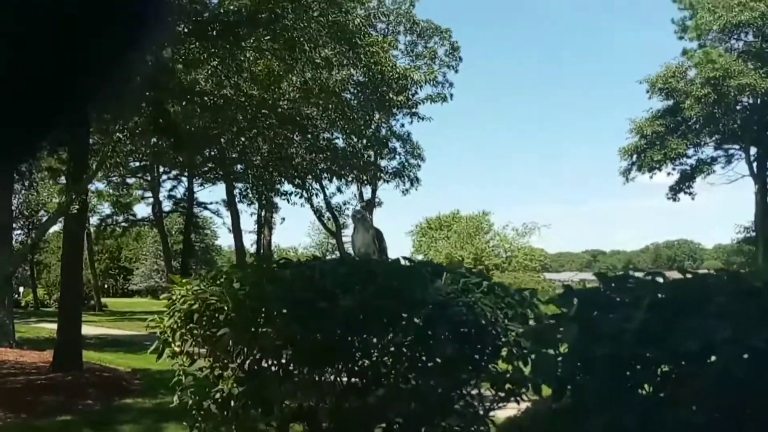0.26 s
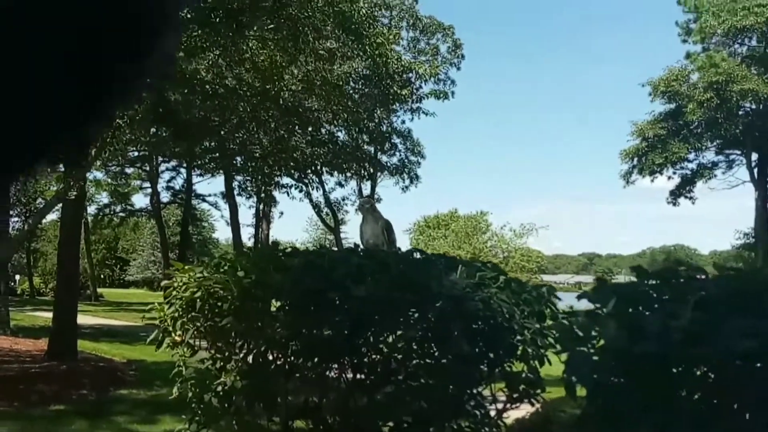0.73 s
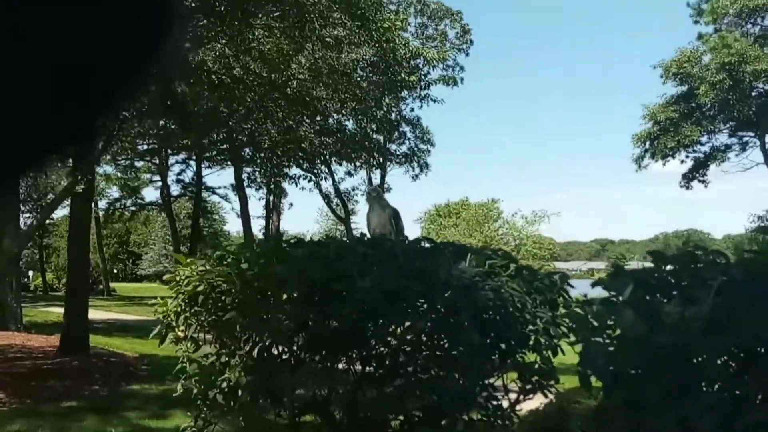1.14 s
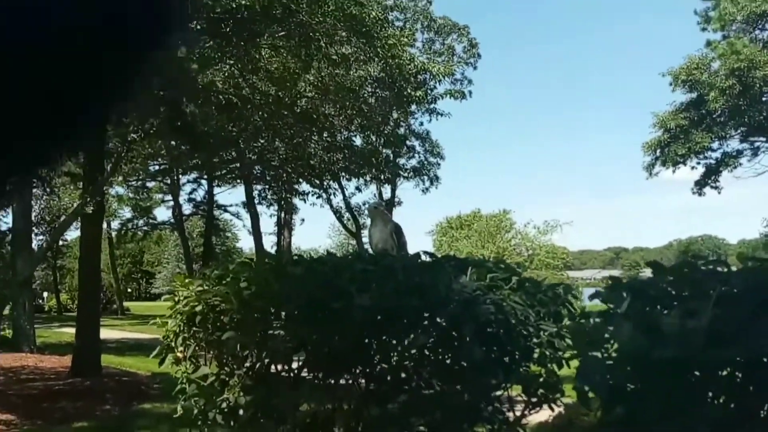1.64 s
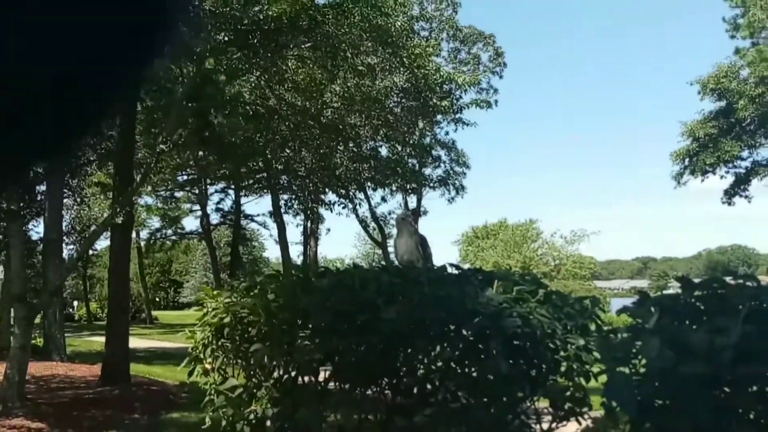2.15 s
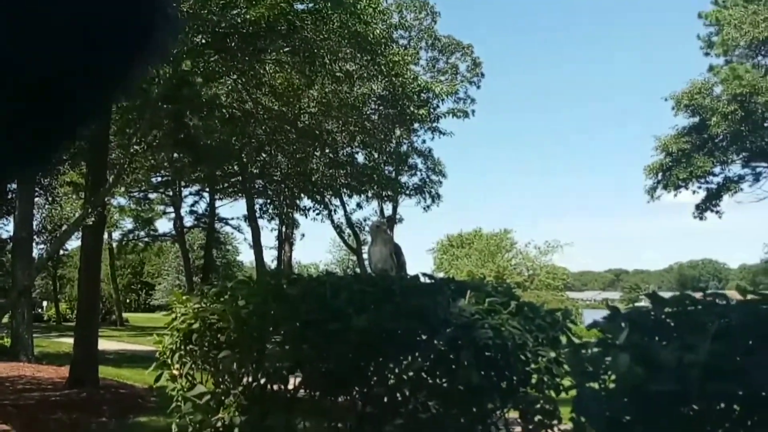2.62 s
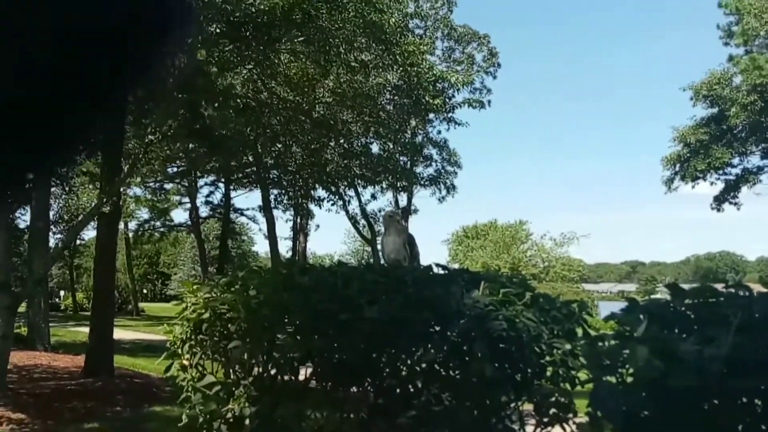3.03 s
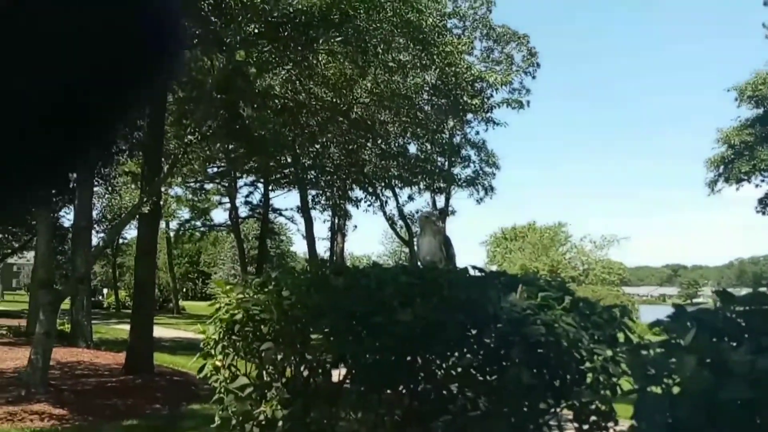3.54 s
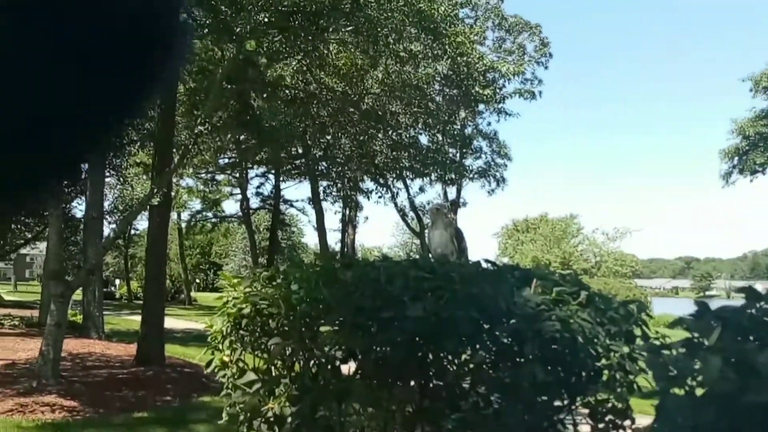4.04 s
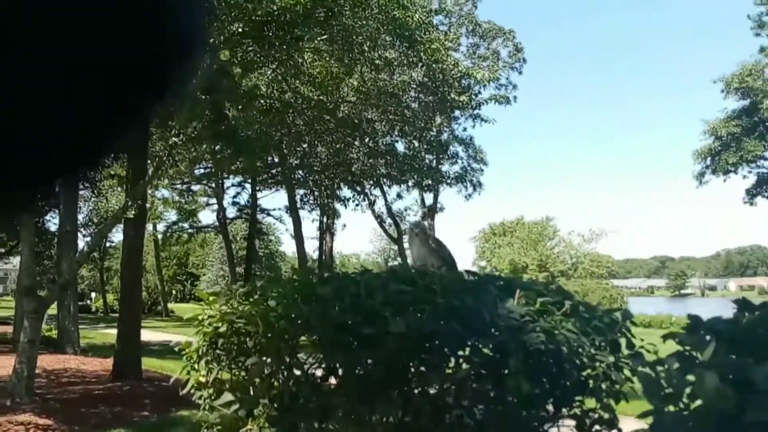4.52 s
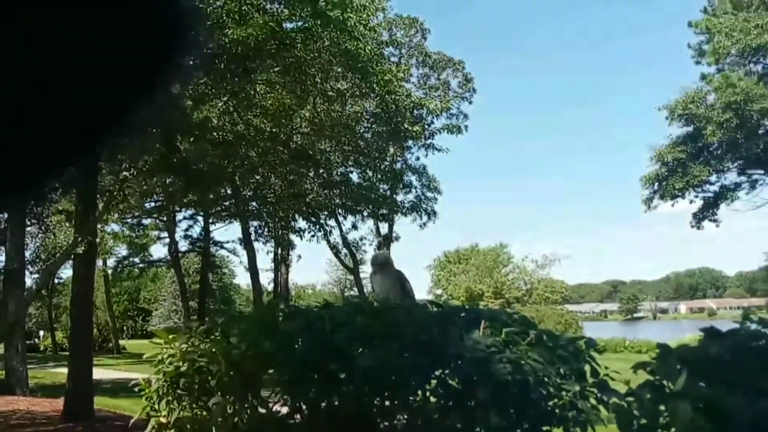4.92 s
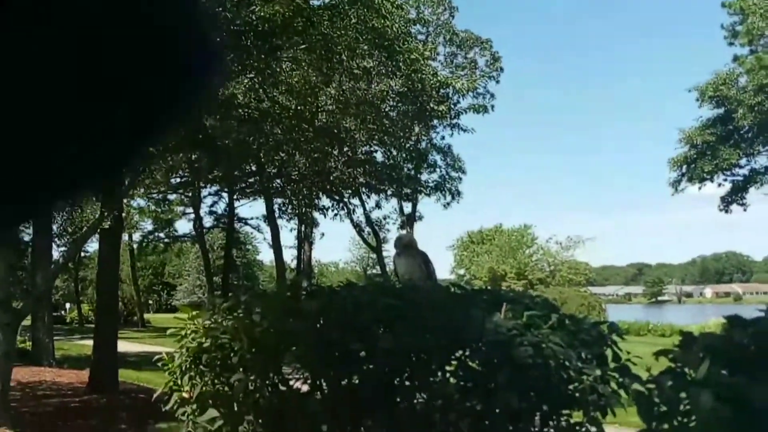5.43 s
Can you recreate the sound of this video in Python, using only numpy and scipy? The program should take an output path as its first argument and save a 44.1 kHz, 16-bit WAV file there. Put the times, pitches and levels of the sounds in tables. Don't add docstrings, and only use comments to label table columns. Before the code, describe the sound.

Outdoors among trees, quiet traffic rumble and leaf hiss run throughout while a distant songbird whistles. Near two seconds a young hawk's falling whistle cracks into a rasp; a closer hawk answers louder, the first calls weakly, then the near one screeches twice more, the last after a long gap. A low motor hum comes up late. A small, slightly dull recorder picks up finger bumps.

```python
import sys
import numpy as np
from scipy import signal
from scipy.fft import rfft, irfft, next_fast_len
from scipy.io import wavfile
from scipy.ndimage import uniform_filter1d, map_coordinates

SR = 44100
rng = np.random.default_rng(int(sys.argv[2]) if len(sys.argv) > 2 else 0)


def unload_wav(signal):
    wavfile.write(
        sys.argv[1],
        SR,
        np.round(np.clip(np.atleast_2d(signal).T, -1, 1) * 32767).astype(np.int16),
    )


def nominal_scale(level):
    x = np.asarray(level, float) / 20
    return 10 ** x


N = 250047


def unit(x):
    return x / np.sqrt(np.mean(x ** 2) + 1e-20)


def along(points, hz):
    f, v = np.transpose(points)
    return np.interp(np.log(hz + 1), np.log(f + 1), v)


def curves(rows, t=None):
    s, *columns = np.transpose(rows)
    if t is None:
        t = np.arange(N) / SR
    gate = np.clip(np.minimum(t - s[0], s[-1] - t) / 0.0012, 0, 1)
    return [np.interp(t, s, column) for column in columns] + [gate]


def humps(rows):
    t = np.arange(N) / SR
    return sum(height * np.exp(-((t - s) / width) ** 2) for s, height, width in rows)


def wobble(rate, count=N):
    knots = rng.standard_normal(int(count * rate / SR) + 4)
    coarse = map_coordinates(knots, [np.arange(0, count + 8, 8) * rate / SR])
    return np.interp(np.arange(count) / 8, np.arange(len(coarse)), coarse)


def tone(hz):
    return 2 * np.pi * np.cumsum(hz) / SR


def coloured(x, spectrum):
    size = next_fast_len(N + 8192)
    gain = nominal_scale(along(spectrum, np.fft.rfftfreq(size, 1 / SR)))
    return irfft(rfft(x, size) * gain, size)[..., :N]


def rush(spectrum, patchy_db):
    z = signal.stft(rng.standard_normal(N), nperseg=512)[2]
    field = uniform_filter1d(rng.standard_normal(z.shape), size=5, axis=0)
    field = uniform_filter1d(field, size=10, axis=1)
    patchy = signal.istft(z * nominal_scale(patchy_db * unit(field)), nperseg=512)[1][:N]
    return unit(coloured(patchy, spectrum))


def trees(x, stretch):
    # frequency in Hz, time to die by 60 dB in seconds.
    dying = [(500, 0.58), (2500, 0.76), (4200, 0.8), (8000, 0.31)]
    hz, t, z = signal.stft(rng.standard_normal(SR), SR, nperseg=256)
    fall = nominal_scale(-60 * t / stretch / along(dying, hz)[:, None])
    tail = signal.istft(z * fall, SR, nperseg=256)[1]
    return signal.oaconvolve(np.pad(x, (400, 0)), tail / np.linalg.norm(tail))[:N]


def bounced(x, bounces):
    copies = [gain * np.pad(x, (round(ms * SR / 1000), 0))[:N] for ms, gain in bounces]
    return (x + sum(copies)) / np.sqrt(1 + sum(gain ** 2 for _, gain in bounces))


def road():
    # time in seconds, rumble level in dB.
    flow = [(0, -49.5), (1.0, -51.5), (1.9, -51), (2.8, -49.5), (3.4, -47.5), (4.5, -49), (5.67, -48)]
    # time in seconds, change in dB, half width in seconds.
    lulls = [(.285, -15, 0.039), (1.36, -7, 0.035), (1.57, -4, 0.014), (1.7, -8, 0.045), (2.91, -6, 0.029),
             (3.71, -5, 0.011), (5.29, -4.5, 0.042)]
    # frequency in Hz, strength in dB per Hz.
    rumble_colour = [(12, -67.5), (20, -41), (52, -10), (75, 1), (102, 1), (162, 2), (196, -6),
                     (243, -12.5), (279, -18.5), (420, -30.5), (550, -61.5), (920, -120)]
    tyre_colour = [(160, -43), (280, -6), (382, -10), (852, 2), (986, -1.5), (1090, -1.5), (1330, -5),
                   (1440, -4), (1790, -13), (2200, -18), (2860, -58.5), (4840, -120)]
    flow_db = curves(flow)[0]
    rumble_db = flow_db + humps(lulls) + 1.0 * wobble(4.1) + 0.73 * wobble(14)
    tyres_db = -58 + (flow_db - flow_db.mean()) + 0.5 * wobble(6.7)
    rumble = nominal_scale(rumble_db) * rush(rumble_colour, patchy_db=0.0)
    return rumble + nominal_scale(tyres_db) * rush(tyre_colour, patchy_db=2.37)


def leaves():
    # time in seconds, level in dB.
    breeze = [(0, -66), (.2, -64.5), (.6, -68), (1.7, -64), (2.6, -60), (3.7, -61), (4.4, -57), (4.9, -61),
              (5.67, -59)]
    # frequency in Hz, strength in dB per Hz.
    leaf_colour = [(1000, -29), (1700, -1.5), (1790, -17.5), (1940, -5), (2100, -12), (2240, -7),
                   (2770, -4), (4440, -4.5), (5230, -10.5), (5670, -2.5), (6770, -7.5), (8260, -51),
                   (10700, -50), (18200, -120)]
    return nominal_scale(curves(breeze)[0]) * rush(leaf_colour, patchy_db=.6)


def motor():
    # time in seconds, hum level in dB.
    load = [(3.0, -67), (3.25, -56), (3.7, -62), (3.95, -48), (4.3, -51), (5.0, -47), (5.3, -52.5),
            (5.42, -46.5), (5.67, -59)]
    # time in seconds, change in dB, half width in seconds.
    octave_swings = [
        (3.8, 9, 0.18),
        (4.0, -19, 0.099),
        (4.95, -10.5, 0.12),
    ]
    on_s, idle_hz, run_hz, spin_up_s = 3.3, 100.9, 119.4, 0.41
    hum_db, gate = curves(load)
    since = np.clip(np.arange(N) / SR - on_s, 0, None)
    hz = run_hz - (run_hz - idle_hz) * np.exp(-since / spin_up_s)
    phase = tone(.985 * hz * (1 + 0.01 * wobble(12)))
    octave_db = -5.5 + humps(octave_swings) + 3.3 * wobble(9)
    low = nominal_scale(2.3 * wobble(9)) * np.sin(phase)
    octave = nominal_scale(octave_db) * np.sin(2 * phase + 1.2)
    return gate * np.sqrt(2) * nominal_scale(hum_db) * (low + octave)


def lingering_echo():
    # frequency in Hz, strength in dB per Hz.
    echo_colour = [(1500, -60), (2200, -16), (2700, -2), (4000, -3.5), (5000, -12.5), (8000, -32)]
    level_db, t60_s = -55.5, 1
    fall = nominal_scale(level_db - 60 * np.arange(N) / SR / t60_s)
    return fall * unit(coloured(rng.standard_normal(N), echo_colour))


def handling():
    # start in seconds, peak in dB, case ring in Hz, time to die by 60 dB in seconds, snap in dB.
    bumps = [
        (3.32, -38.5, 396, 0.029, -29),
        (5.161, -38, 515, 0.023, -13),
        (5.18, -31.5, 255, 0.051, -9),
        (5.187, -31.5, 374, 0.026, -27),
        (5.197, -42.5, 300, 0.036, -25),
        (5.3998, -25, 260, 0.013, -2),
    ]
    # start in seconds, peak in dB, pitch in Hz.
    ticks = [
        (.553, -50.5, 6300),
        (0.616, -55, 7160),
        (5.378, -44, 6550),
    ]
    out, t = np.zeros(N + SR), np.arange(SR // 10) / SR
    for s, db, hz, t60, snap_db in bumps:
        ring = nominal_scale(-60 * t / t60) * np.cos(2 * np.pi * hz * t) * (1 - np.exp(-t / 0.0001))
        snap = t / 0.0004 * np.exp(-t / 0.0002) * (1 - np.exp(-t / .0001))
        out[round(s * SR):][:len(t)] += nominal_scale(db) * (ring + nominal_scale(snap_db + 18) * snap)
    for s, db, hz in ticks:
        out[round(s * SR):][:len(t)] += nominal_scale(db - 60 * t / 0.0078) * np.sin(2 * np.pi * hz * t)
    return out[:N]


def rubbing():
    # time in seconds, level in dB, half width in seconds.
    rubs = [
        (3.33, -52, 0.015),
        (5.14, -56, 0.031),
        (5.193, -42, 0.029),
        (5.4, -53, .02),
    ]
    # frequency in Hz, strength in dB per Hz.
    skin = [(100, -35), (200, 10), (400, -3), (900, -8.5), (1500, -5), (2500, -31), (5000, -75)]
    strength = humps([(s, nominal_scale(db), width) for s, db, width in rubs])
    return strength * unit(coloured(rng.standard_normal(N), skin))


def rustle():
    # frequency in Hz, strength in dB per Hz.
    feathers = [(180, -39), (300, -9), (873, -0.5), (949, -1), (1680, -1.5), (2150, 1), (4490, -5),
                (6170, 5.5), (7500, -11), (8260, -31), (10700, -70), (18200, -120)]
    start_s, level_db, rise_s, hold_s, t60_s = 4.422, -39.5, .01, .045, .2
    t = np.arange(N) / SR - start_s
    rise = np.clip(t / rise_s, 0, 1) ** 2
    fall = nominal_scale(-60 * np.clip(t - rise_s - hold_s, 0, 1) / t60_s)
    grains = unit(rush(feathers, patchy_db=4.0) * nominal_scale(0.62 * wobble(400)))
    return nominal_scale(level_db) * rise * fall * grains


def note(rows, start=0, level_db=0, factor=1, burr=0, grain_db=0):
    t = np.arange(SR // 4) / SR + rows[0][0]
    hz, db, gate = curves(rows, t)
    hz = hz * factor * (1 + burr * wobble(500, count=len(t)))
    db = db + level_db + grain_db * wobble(250, count=len(t))
    out = np.zeros(N + SR)
    out[round((start + t[0]) * SR):][:len(t)] = gate * nominal_scale(db) * np.sqrt(2) * np.sin(tone(hz))
    return out[:N]


def songbird():
    # time in seconds, pitch in Hz, level in dB.
    chirp = [(4.214, 3550, -70), (4.222, 3790, -52), (4.232, 4270, -66), (4.242, 4300, -58.5),
             (4.252, 3780, -47.5), (4.262, 3400, -58), (4.27, 3300, -73)]
    # seconds after the phrase starts, pitch in Hz, level in dB.
    sweep_up = [(-.004, 2400, -22), (.004, 4400, -12), (.014, 5900, -12), (.026, 6750, -10),
                (.07, 6950, -16), (.09, 6950, -40)]
    sweep_down = [(.058, 4300, -12), (.064, 3750, -4), (.071, 3150, -4), (.082, 2750, -7),
                  (.098, 2300, -20)]
    # seconds after start, share of held pitch, level in dB.
    held = [(.012, .93, -25), (.02, .985, -3), (.028, 1, 0), (.058, 1, -2), (.068, .995, -25)]
    undertone = [(.022, .66, -32), (.032, .67, -17), (.055, .69, -17), (.064, .69, -32)]
    # start in seconds, level in dB, upsweep in dB, downsweep in dB.
    song = [
        (.079, -53, -5, 0.5),
        (0.942, -45.5, -1, 1.5),
        (1.358, -46, -4, -0.5),
        (2.503, -52.5, 2, -10),
        (3.9, -49.5, -1.5, -1),
        (4.274, -57, 3, 10),
        (5.23, -51.5, 5, -11),
    ]
    held_hz = [4860, 4075, 4085, 4200, 4150, 4180, 3980]
    notes, sweeps = note(chirp, burr=.01, grain_db=1), 0
    for (s, db, up_db, down_db), hz in zip(song, held_hz):
        notes = notes + note(held, s, db, hz, burr=.007, grain_db=.5)
        notes = notes + note(undertone, s, db, hz, burr=.02, grain_db=3)
        sweeps = sweeps + note(sweep_up, s, db + up_db, burr=.022, grain_db=6)
        sweeps = sweeps + note(sweep_down, s, db + down_db, burr=.05, grain_db=4)
    late = nominal_scale(-11) * np.pad(notes + nominal_scale(-14) * sweeps, (round(.195 * SR), 0))[:N]
    blur = nominal_scale(-3) * sweeps + nominal_scale(-8) * trees(sweeps, stretch=.45)
    return notes + late + nominal_scale(-6.0) * trees(notes, stretch=0.99) + blur


def whistle():
    # time in seconds, pitch in Hz, effort in dB.
    falling = [(1.762, 2098, -49), (1.782, 2105, -42.5), (1.806, 1803, -34), (1.822, 1566, -35.5),
               (1.848, 1428, -35), (1.898, 1340, -35.5), (1.93, 1223, -36.5), (1.96, 1118, -42.5),
               (2.0, 943, -48)]
    overtone_levels = [0, -3, -11.5, -5.5, -10.5]
    # frequency in Hz, gain in dB.
    windpipe = [(900, -16), (1400, -16), (2050, 0.5), (2800, 3.5), (3600, -2.5), (4200, -17.5), (6500, -19),
                (8200, -41)]
    swell_s, fade_s, break_s, break_lasts_s = .018, .04, 1.9, .05
    pitch, effort_db, gate = curves(falling)
    t = np.arange(N) / SR
    swell = np.clip((t - falling[0][0]) / swell_s, 0, 1)
    fade = np.clip((falling[-1][0] - t) / fade_s, 0, 1)
    breaking = np.clip((t - break_s) / break_lasts_s, .1, 1)
    phase = tone(pitch * (1 + 0.012 * breaking * wobble(300)))
    flap = 1 + 0.73 * breaking * np.cos(tone(np.full(N, 190.)))
    kept = [1.1 - breaking, 1] + [1 - breaking] * 3
    total = 0
    for k, db in enumerate(overtone_levels):
        level_db = db + along(windpipe, (k + 1) * pitch) + 0.97 * wobble(70)
        total = total + kept[k] * nominal_scale(level_db) * np.sin((k + 1) * phase)
    return swell * fade * flap * nominal_scale(effort_db + 4.5) * total


def rasp(rows, shut, opens, syrinx, octave_db, depth, widths):
    # frequency in Hz, gain in dB.
    gape = [(300, -44), (900, -4.5), (1700, -8), (2200, -4), (2550, 1.5), (5200, -2), (6500, 2.5),
            (7400, 2), (8000, -6), (9000, -11)]
    hz, t, z = signal.stft(rng.standard_normal(N), SR, nperseg=256, noverlap=192)
    opening = curves(rows, t)[1]
    throat, mouth, mouth_db, beak, beak_db = [rest + change * opening for rest, change in zip(shut, opens)]
    throat_width, mouth_width, beak_width = widths

    def peak(centre, width):
        return 1 / (1 + (2 * (hz[:, None] - centre) / width) ** 2) ** 2

    power = peak(throat, throat_width) + nominal_scale(2 * mouth_db) * peak(mouth, mouth_width)
    power = power + nominal_scale(2 * beak_db + 3.5) * peak(beak, beak_width) + nominal_scale(-75.0)
    power = power / np.mean(power, axis=0)
    breath = unit(signal.istft(z * np.sqrt(power), SR, nperseg=256, noverlap=192)[1][:N])

    level_db, _, gate = curves(rows)
    rate, rate_sag, voice, voice_sag, voice_db = syrinx
    since = np.clip(np.arange(N) / SR - rows[0][0], 0, rows[-1][0] - rows[0][0])
    depth = np.clip(depth * nominal_scale(2.5 * wobble(30)), 0, 1)
    flap = 1 + depth * np.cos(tone((rate - rate_sag * since) * (1 + .02 * wobble(50))))
    harsh = coloured(breath * flap / np.sqrt(1 + depth ** 2 / 2), gape)

    phase = tone((voice - voice_sag * since) * (1 + .035 * wobble(250)))
    octave_fall = np.exp(-(since / 0.13) ** 4)
    octave = nominal_scale(octave_db) * octave_fall * flap * np.sin(2 * phase)
    voiced = nominal_scale(3 * wobble(90)) * (nominal_scale(voice_db) * np.sin(phase) + octave)
    return gate * nominal_scale(level_db + 0.5 * wobble(30)) * (harsh + voiced)


def hawks():
    # time in seconds, effort in dB, bill opening from 0 to 1.
    efforts = [
        [(1.875, -58, 0.07), (1.925, -34, .2), (1.96, -34, 0.46), (2.056, -37.5, 1), (2.1, -47.5, .9),
         (2.12, -67, 0.6)],
        [(2.694, -52.5, .8), (2.714, -46, 0.84), (2.81, -43.5, 1), (2.93, -42, 0.94), (2.99, -58.5, 0.9)],
        [(2.142, -36, 1), (2.16, -24, 1), (2.22, -25.5, 0), (2.3, -29.5, 0), (2.44, -26.5, 0.72),
         (2.531, -30.5, 0.68), (2.56, -68, .8)],
        [(3.066, -57, .6), (3.08, -35, .6), (3.11, -32.5, 0.83), (3.22, -31.5, 0.85), (3.3, -28, 1.1),
         (3.464, -31.5, 0.83), (3.5, -80, .6)],
        [(5.026, -52, 0.5), (5.037, -30.5, 0.3), (5.13, -26.5, 0.88), (5.224, -29, 0.82), (5.27, -32, 0.87),
         (5.29, -68, .8)],
    ]
    # throat in Hz, mouth in Hz, mouth in dB, beak in Hz, beak in dB.
    bill_shut = [(2840, 3680, -19, 6650, -35), (2700, 4130, -5.5, 6600, -30), (2900, 3490, 1, 6100, -14.5),
                 (3140, 3900, -7.5, 5520, -13), (3400, 3900, -9.5, 5900, 1.5)]
    bill_opens = [(558, 30, 1, 197, 8), (679.5, 30, 1, 200, 8.3), (452, 1050, 2.9, -100, 6.2),
                  (302, 820, 10.1, -150, 7), (-53, 47, 10.7, -600, 1.1)]
    # flutter in Hz, its sag in Hz per s, voice in Hz, its sag in Hz per s, voice level in dB.
    voices = [(198.6, 77, 1330, 2900, -19.5), (205, 145, 320, -7, -27.5), (215, 55.6, 1410, 849.5, -32),
              (200.4, 52.7, 1080, 149.5, -25), (199.5, 71.5, 910, -4, -26)]
    voice_octaves = [-11.5, -24, -7, -21, -27]
    flutter_depths = [.45, .4, .3, .45, .5]
    # throat in Hz, mouth in Hz, beak in Hz.
    resonance_widths = [(1100, 770, 1700), (1100, 1200, 2300), (800, 1150, 1500), (1205, 1700, 1870),
                        (950, 550, 950)]
    # delay in milliseconds, gain.
    reflections = [
        [(2.85, .45), (3.55, .25), (4.77, .12)],
        [(2.86, .5), (7.07, .18), (1.4, .2)],
        [(6.33, .35), (5.72, .2), (1.71, .15)],
        [(6.14, .3), (3.2, .15), (8.0, .15)],
        [(2.0, .2), (4.47, .15), (10.2, .12)],
    ]
    settings = zip(efforts, bill_shut, bill_opens, voices, voice_octaves, flutter_depths, resonance_widths)
    calls = [rasp(*setting) for setting in settings]
    calls[0] = calls[0] + whistle()
    return sum(bounced(call, bounces) + nominal_scale(-15) * trees(call, stretch=0.65)
               for call, bounces in zip(calls, reflections))


def scene():
    background = road() + leaves() + motor() + lingering_echo()
    recorder_touches = handling() + rubbing()
    return (background + recorder_touches + rustle() + songbird() + hawks())[None]


def roll_off(x):
    return signal.sosfilt(signal.butter(12, 8410, fs=SR, output="sos"), x)


def record(dry):
    # frequency in Hz, gain in dB.
    treble_limit = [(20, -1), (7000, -0.5), (7600, -2), (8000, -8), (8400, -15.5), (8500, -108)]
    return roll_off(coloured(dry, treble_limit))


dry = scene()
out = record(dry)
unload_wav(out)
```